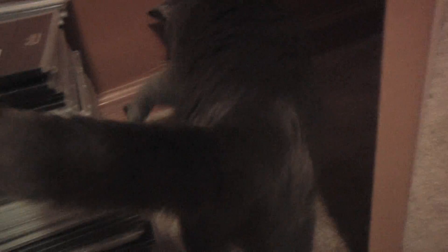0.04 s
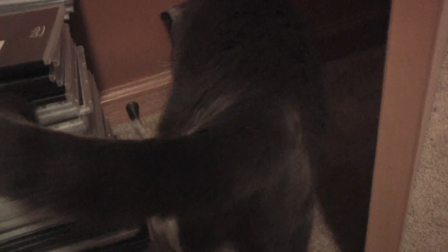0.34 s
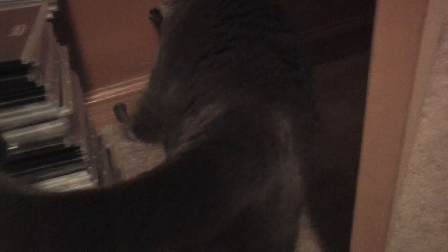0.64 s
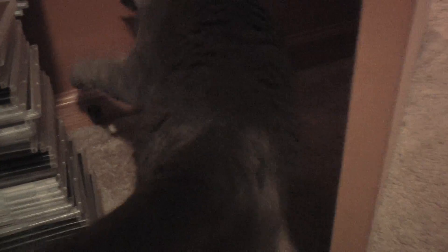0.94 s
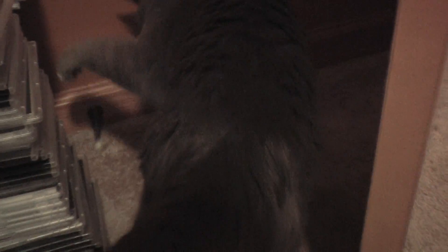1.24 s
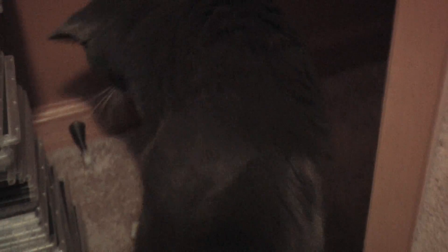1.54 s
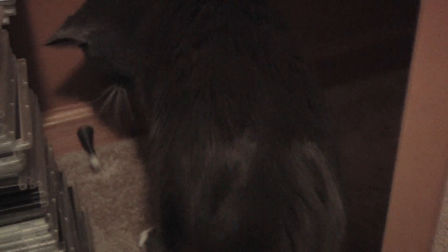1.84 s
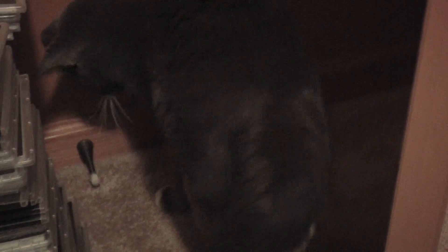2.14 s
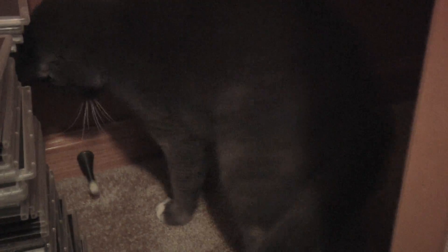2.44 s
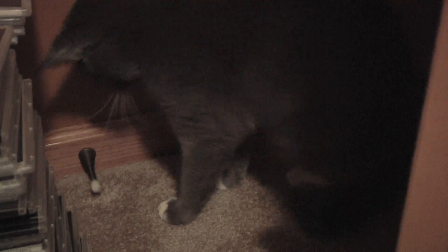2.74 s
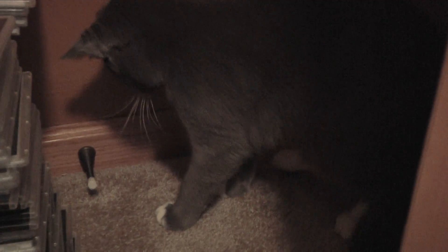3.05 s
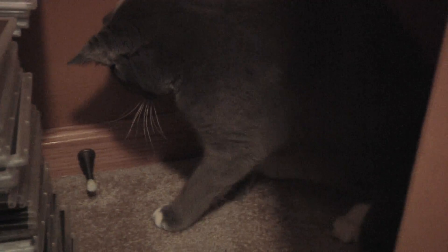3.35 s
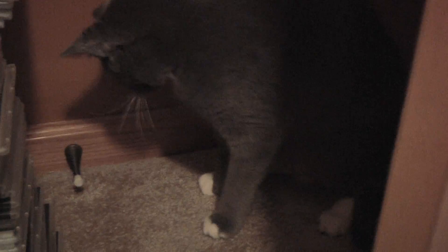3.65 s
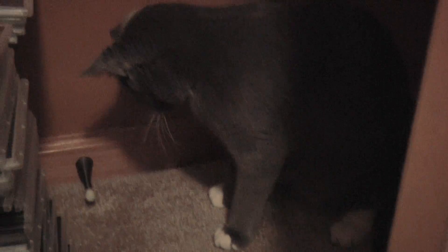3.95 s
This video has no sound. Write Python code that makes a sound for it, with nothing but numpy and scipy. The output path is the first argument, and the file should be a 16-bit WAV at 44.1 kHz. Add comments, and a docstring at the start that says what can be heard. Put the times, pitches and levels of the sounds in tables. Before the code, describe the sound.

A cat bats a springy door stop, its fluttering twang slowly fading out.

```python
"""Cat pawing a door stop

A cat paws a coil-spring door stop on a skirting board in a small, quiet room, then lets it ring out.
The spring swings about 15-21 times a second, faster as it dies down; its coils slap shut twice per swing.
Each slap thuds in the wall, knocks in the board, clacks in the base, rings the wire and sends a zing
along the coil that returns as falling chirps. Once, a paw lands on the carpet."""
import sys
import numpy as np
from scipy import signal
from scipy.fft import rfft, irfft
from scipy.io import wavfile

SR = 44100
rng = np.random.default_rng(int(sys.argv[2]) if len(sys.argv) > 2 else 0)


def transcribe(signal):
    """Save signal, clipped to [-1, 1], as a 16-bit WAV file at the path in sys.argv[1]."""
    frames = np.atleast_2d(signal).T
    limited = np.clip(frames, -1, 1)
    pcm = np.round(limited * 32767).astype(np.int16)
    wavfile.write(sys.argv[1], SR, pcm)


N = 176400
AGE_S = np.arange(16384) / SR
SLAP_NORM = np.sqrt(.03 * SR)  # unit-energy slaps 30 ms apart give RMS 1


def undb(db):
    """Decibels to gain."""
    return 10 ** (np.asarray(db) / 20)


def unit(x):
    """Scale to energy 1."""
    return x / np.sqrt(np.sum(x ** 2))


def fade(t60_s):
    """Exponential decay."""
    return np.exp(-np.log(1000) * AGE_S / t60_s)


def colour(x, points):
    """Minimum-phase filter through (frequency [Hz], gain [dB]) points."""
    n, (hz, db) = len(x), np.array(points).T
    bins_hz = np.maximum(np.arange(n // 2 + 1) * SR / n, 1)
    cepstrum = irfft(np.log(undb(np.interp(np.log(bins_hz), np.log(hz), db))), n)
    cepstrum[1:n // 2] *= 2
    cepstrum[n // 2 + 1:] = 0
    return irfft(rfft(x) * np.exp(rfft(cepstrum)), n)


def burst(points, t60_s, room_t60_s, room_db, rise_s):
    """Dense ring: decaying coloured noise with a longer room tail."""
    near, far = rng.standard_normal((2, len(AGE_S)))
    onset = 1 - np.exp(-AGE_S / rise_s)
    noise = unit(near * fade(t60_s)) + undb(room_db) * unit(far * fade(room_t60_s))
    return unit(colour(onset * noise, points))


def modes(table, rise_s):
    """Decaying sines of a struck part; rows of (frequency [Hz], relative level [dB], T60 [s])."""
    ring = sum(undb(db) * fade(t60_s) * np.sin(2 * np.pi * (hz * AGE_S + rng.random()))
               for hz, db, t60_s in table)
    return unit(ring * (1 - np.exp(-AGE_S / rise_s)))


def strike(times_s, gains, response):
    """Sound one response at every given time."""
    train = np.zeros(N)
    np.add.at(train, np.clip((times_s * SR).astype(int), 0, N - 1), gains)
    return signal.fftconvolve(train, response)[:N] * SLAP_NORM


def room_tone():
    """Faint rumble and hiss, wider in the treble."""
    # (frequency [Hz], relative level [dB])
    spectrum = [(30, -3), (60, -7.5), (125, 2), (300, -2.5), (800, -7.5), (1200, -15.5), (4500, -24.5),
                (8500, -29.5), (16000, -34.5)]
    mid, side = (unit(colour(rng.standard_normal(N), spectrum)) * np.sqrt(N) for _ in range(2))
    side = colour(side, [(100, -22), (1000, -10), (8000, 0)])
    return undb(-53.5) * (mid + np.outer([1, -1], side))


def paw_bump(at_s=.695, hz=52.3):
    """A paw lands on the carpet: a soft, deep bump through the floor."""
    wave = fade(.15) * (1 - fade(.093)) * np.sin(2 * np.pi * hz * AGE_S)
    return undb(-36) * strike(np.array([at_s]), .89, wave) / SLAP_NORM


def paw_rings(t60_s=.26):
    """Woody notes of the board under single paw blows."""
    # (time [s], frequency [Hz], level [dB])
    blows = [(0.227, 188.8, -27.5), (.486, 934, -44)]
    return sum(strike(np.array([at_s]), undb(db), modes([(hz, 0, t60_s)], rise_s=.002))
               for at_s, hz, db in blows)


def wall_hum(swings_s, hz=120.6, t60_s=.25):
    """One push per swing keeps the wall humming."""
    return strike(swings_s, undb(-57.5), modes([(hz, 0, t60_s)], rise_s=.009))


def coil_song(t, back, return_db=-5, t60_s=.022):
    """Coil overtones swell and fade as the plane of the swing turns."""
    # (peak time [s], Gaussian width [s], frequency [Hz], level [dB])
    overtones = [(2.29, 0.27, 3430, -55.5), (3.21, 0.11, 6300, -66.5), (3.52, 0.28, 5550, -65),
                 (3.578, 0.16, 3570, -64.5)]
    out = 0
    for peak_s, width_s, hz, db in overtones:
        swell = np.exp(-.5 * ((t - peak_s) / width_s) ** 2)
        out += strike(t, undb(db + back * return_db) * swell, modes([(hz, 0, t60_s)], rise_s=.0027))
    return out


def coil_chirps(t, zing_db, gentle, fall_hz_per_s=380000, width_s=.0011):
    """The zing runs up and down the coil and returns as short falling chirps."""
    # (delay [s], centre [Hz], hard-swing level re zing [dB], gentle-swing level re zing [dB])
    echoes = [(.0018, 5450, -25.5, 7.5), (.0075, 5700, -36, -10), (0.0128, 6660, -11, -11)]
    jitter_s, scatter_db, side_db = .0003, 2.2, -7
    out = 0
    for delay_s, hz, hard_db, gentle_db in echoes:
        age_s = AGE_S - delay_s
        envelope = np.exp(-.5 * (age_s / width_s) ** 2)
        phase = 2 * np.pi * (hz * age_s - .5 * fall_hz_per_s * age_s ** 2)
        late, size = rng.standard_normal((len(t), 2)).T
        gain = undb(zing_db + hard_db + gentle * (gentle_db - hard_db) + scatter_db * size)
        mid, side = (strike(t + jitter_s * late, gain, unit(envelope * wave(phase)))
                     for wave in (np.sin, np.cos))
        out += mid + undb(side_db) * np.outer([1, -1], side)
    return out


def unrest(t):
    """Slap-to-slap variation: full under the paw, small in the ring-out."""
    return np.interp(t, [1.363, 2.24], [1, .36])


def slap_layer(t, back, db, core, dense, vary, side_db):
    """Slaps in one part: a constant core, a dense ring per swing direction and a wandering timbre."""
    gain = undb(db) / np.sqrt(1 + vary ** 2)
    mid = sum(strike(t, gain * (back == way), unit(core + dense())) for way in range(2))
    for steps in rng.standard_normal((4, len(t))):
        wander = np.cos(np.pi / 2 * np.cumsum(steps * unrest(t)))
        mid += strike(t, gain * vary * wander / np.sqrt(2), dense())
    side = sum(strike(t, gain * (back == way), dense()) for way in range(2))
    return mid + undb(side_db) * np.outer([1, -1], side)


def wall_thud(t, back, db):
    """Each slap pushes the wall and rings its low modes."""
    # (frequency [Hz], relative level [dB], T60 [s])
    wall_modes = [(86.2, -24.5, 0.7), (121.6, -10, 0.297), (148.1, -4.5, 0.209), (191.7, -5.5, 0.37),
                  (238.9, -4.5, 0.26), (310.9, -7.5, 0.27)]
    # (frequency [Hz], relative level [dB])
    spectrum = [(45, -68), (125, -2), (195, -0.5), (260, 1), (380, -8.5), (1500, -100)]
    push = unit(colour(1. * (AGE_S == 0), spectrum))
    core = undb(4.5) * push + undb(5.5) * modes(wall_modes, rise_s=.006)
    dense = lambda: burst(spectrum, t60_s=.058, room_t60_s=.57, room_db=5, rise_s=.0036)
    return slap_layer(t + .001, back, db, core, dense, vary=.46, side_db=-54.5)


def board_knock(t, back, db):
    """Each slap rings the skirting board."""
    # (frequency [Hz], relative level [dB], T60 [s])
    board_modes = [(477.3, -4.5, 0.26), (531, -2, 0.11), (580.2, 0, .2), (656, -9, 0.053),
                   (778.4, -6, 0.29), (859, -16, 0.16)]
    # (frequency [Hz], relative level [dB])
    spectrum = [(230, -33.5), (360, -3), (570, -1), (800, -5), (1050, -11.5), (2700, -87.5)]
    core = undb(5) * modes(board_modes, rise_s=.00033)
    dense = lambda: burst(spectrum, t60_s=.064, room_t60_s=.4, room_db=.5, rise_s=.0018)
    return slap_layer(t + .0011, back, db, core, dense, vary=.82, side_db=-18.5)


def base_clack(t, back, db):
    """Each slap rings the metal base."""
    # (frequency [Hz], relative level [dB], T60 [s])
    base_modes = [(1321, 0, 0.23), (1331, -17.5, 0.14), (1627, 9, 0.086), (1760, 0, 0.17),
                  (2030, -16, 0.063), (2215, 2.5, 0.11)]
    # (frequency [Hz], relative level [dB])
    spectrum = [(800, -48.5), (1150, -2), (1380, 6), (2250, 1), (2450, -1.5), (4600, -92.5)]
    core = undb(.5) * modes(base_modes, rise_s=.00027)
    dense = lambda: burst(spectrum, t60_s=.036, room_t60_s=.32, room_db=-5, rise_s=.0019)
    return slap_layer(t + .000864, back, db, core, dense, vary=.82, side_db=-10)


def wire_ring(t, back, db):
    """The colliding coils ring the wire."""
    # (frequency [Hz], relative level [dB], T60 [s])
    wire_modes = [(2390, -11, 0.29), (2945, 10.5, 0.085), (3320, -1.5, 0.07), (3607, 5.5, 0.11)]
    # (frequency [Hz], relative level [dB])
    spectrum = [(1700, -50), (2550, -4), (3000, 1.5), (3750, -1), (4200, -14), (7000, -90.5)]
    core = undb(-.5) * modes(wire_modes, rise_s=.00033)
    dense = lambda: burst(spectrum, t60_s=.024, room_t60_s=.2, room_db=-4, rise_s=.0014)
    return slap_layer(t + .00133, back, db, core, dense, vary=1, side_db=-8)


def coil_zing(t, back, db):
    """A bright burst sent along the coil."""
    # (frequency [Hz], relative level [dB])
    spectrum = [(4200, -33), (5100, -7.5), (5900, -5), (6700, -15), (7500, -17.5), (8400, -34),
                (11000, -24)]
    dense = lambda: burst(spectrum, t60_s=.011, room_t60_s=.18, room_db=-6, rise_s=.0007)
    return slap_layer(t + .00026, back, db, 0, dense, vary=.67, side_db=-6.5)


def coil_tick(t, back, db):
    """A hissy tick as the coils shut."""
    # (frequency [Hz], relative level [dB])
    spectrum = [(6000, -20), (8200, -8), (9700, 0), (11700, -6), (16000, -19)]
    dense = lambda: burst(spectrum, t60_s=.022, room_t60_s=.13, room_db=-1.5, rise_s=.0013)
    return slap_layer(t + .00022, back, db, 0, dense, vary=.97, side_db=1.5)


def slap_times(grab_s=.02, drift_cycles_per_s=.02):
    """Slap times [s] and directions (1 = return swing); each run of swings ends grab_s early."""
    # last run is the ring-out: (start [s], swing rate [Hz], speed-up [Hz/s], return slap phase [cycles])
    runs = [(.012, 15.6, 4.8, .46), (.386, 15.1, 0, .48), (.732, 14.45, 2.3, .53), (1.235, 15.1, 2.75, .46),
            (2.095, 17.31, 2.037, .455)]
    ends_s = [run[0] for run in runs[1:]] + [N / SR]
    slaps, k = [], np.arange(200)
    back = k % 2
    for (start_s, hz, hz_per_s, return_phase), end_s in zip(runs, ends_s):
        free_s = np.maximum(start_s + k / 2 / hz - runs[-1][0], 0)
        cycles = k // 2 + (return_phase - drift_cycles_per_s * free_s) * back
        t = start_s + 2 * cycles / (hz + np.sqrt(hz ** 2 + 2 * hz_per_s * cycles))
        slaps.append(np.c_[t, back][t < end_s - grab_s])
    return np.vstack(slaps).T


def slap_levels(t, back, scatter_db=1, return_zing_db=-1.5):
    """Thud, knock, clack, wire and zing levels [dB] of every slap."""
    # both before trim: (time [s], thud [dB], knock [dB], clack [dB], wire [dB], zing [dB])
    ordinary_slaps = [(0, -37.5, -49, -53, -50, -54), (0.33, -37, -47, -56.5, -53, -55.5),
                      (0.648, -29, -37, -46, -43.5, -47.0), (1.101, -40.5, -47, -53.0, -52, -53),
                      (1.33, -31, -48, -55, -48, -51), (1.42, -40, -46.5, -55, -52.0, -55.0),
                      (1.698, -30, -40.5, -50.5, -48.5, -50), (2.1, -39.5, -45.5, -59, -53.0, -57),
                      (2.55, -38, -42.5, -57.0, -57.5, -60.0), (2.85, -41.5, -49, -60.5, -61.5, -61.0),
                      (3.15, -55, -60, -67.5, -65.5, -66), (4, -53.5, -62.5, -80, -66, -69)]
    hard_slaps = [(0.041, -30.5, -43, -53, -53.5, -55.5), (0.227, -27.5, -37, -47, -44.5, -49.5),
                  (0.386, -27, -34.5, -47.5, -46.5, -46), (0.484, -27.5, -31, -40.0, -46.5, -42.5),
                  (0.585, -25, -31, -37.5, -37.5, -41.5), (0.732, -24.5, -32.5, -44.5, -43.5, -45),
                  (0.769, -30.5, -29.5, -43.5, -42.5, -45), (0.801, -22, -27, -29.5, -39.5, -44),
                  (0.837, -30, -32, -34.5, -40.5, -42), (0.869, -27.5, -28.5, -27.5, -38, -42),
                  (0.905, -25.5, -31.5, -31.5, -39.5, -39.5), (0.972, -24.5, -30.5, -31.5, -39, -45.5),
                  (1.038, -27, -35.5, -38.5, -45.0, -47.0), (1.169, -44, -44, -51, -44, -49.0),
                  (1.235, -25, -36.5, -41, -41.5, -45.5), (1.265, -25, -29, -34.5, -37.5, -38.5),
                  (1.494, -31.5, -37.5, -49, -46.5, -47), (1.585, -29.5, -34, -50, -42, -46.5)]
    # (thud [dB], knock [dB], clack [dB], wire [dB], zing [dB])
    trim_db = [-0.4, -0.46, -0.25, -0.74, -0.34]
    knots_s, *curves_db = np.array(ordinary_slaps).T
    db = np.array([np.interp(t, knots_s, curve) for curve in curves_db]).T
    db += scatter_db * unrest(t)[:, None] * rng.standard_normal(db.shape)
    db[:, -1] += return_zing_db * (back - .5)
    for at_s, *hard_db in hard_slaps:
        db[np.argmin(abs(t - at_s))] = hard_db
    return (db + trim_db).T


def spring(low_cut_hz=67):
    """Every slap sounds in the wall, board, base, wire and coil."""
    t, back = slap_times()
    thud_db, knock_db, clack_db, wire_db, zing_db = slap_levels(t, back)
    gentle = np.interp(t, [1.4, 5], [0, 1])  # late slaps soften and lose their hiss
    out = wall_thud(t, back, thud_db) + board_knock(t, back, knock_db) + base_clack(t, back, clack_db)
    out += wire_ring(t, back, wire_db + 3.5 * gentle)
    out += coil_zing(t, back, zing_db - 1.5 + 3.5 * gentle)
    out += coil_tick(t, back, zing_db - 13 - 7 * gentle)
    out += coil_chirps(t, zing_db, gentle) + coil_song(t, back) + paw_rings() + wall_hum(t[back == 0])
    return signal.sosfilt(signal.butter(2, low_cut_hz, "high", fs=SR, output="sos"), out)


def scene():
    """Spring, paw and room in stereo."""
    return spring() + paw_bump() + room_tone()


def record(dry):
    """Steep low-pass at 16.1 kHz."""
    return signal.sosfilt(signal.ellip(10, .2, 80, 16100, fs=SR, output="sos"), dry)


dry = scene()
out = record(dry)
transcribe(out)
```